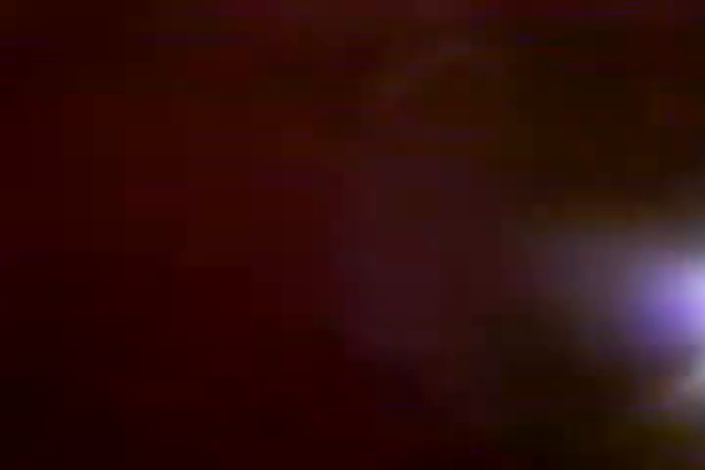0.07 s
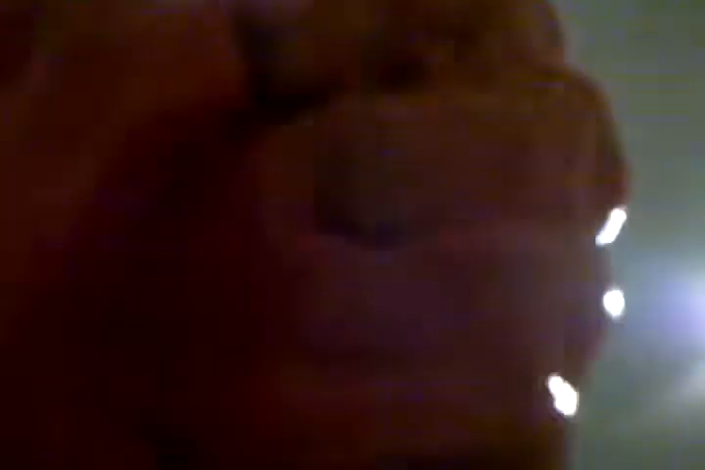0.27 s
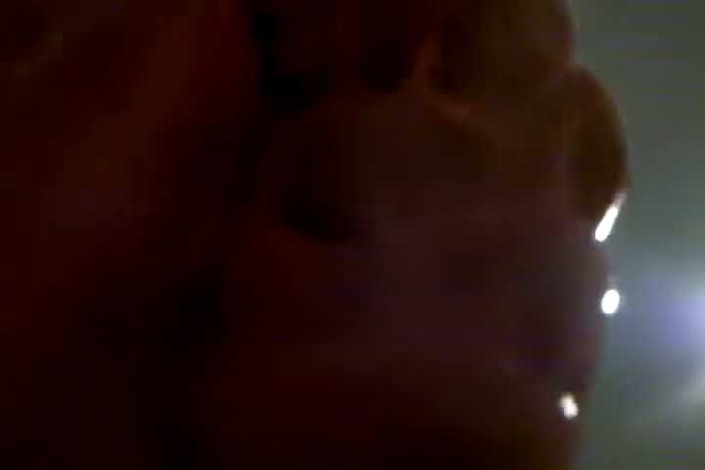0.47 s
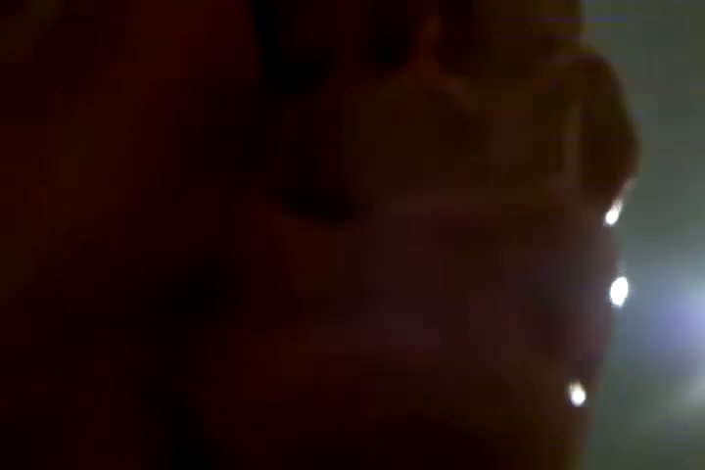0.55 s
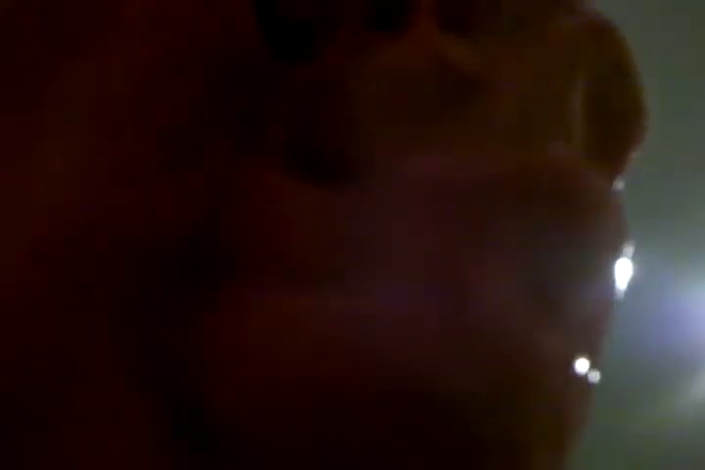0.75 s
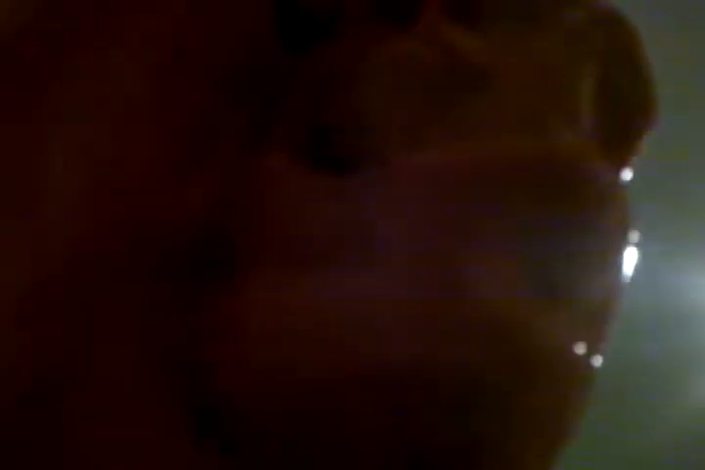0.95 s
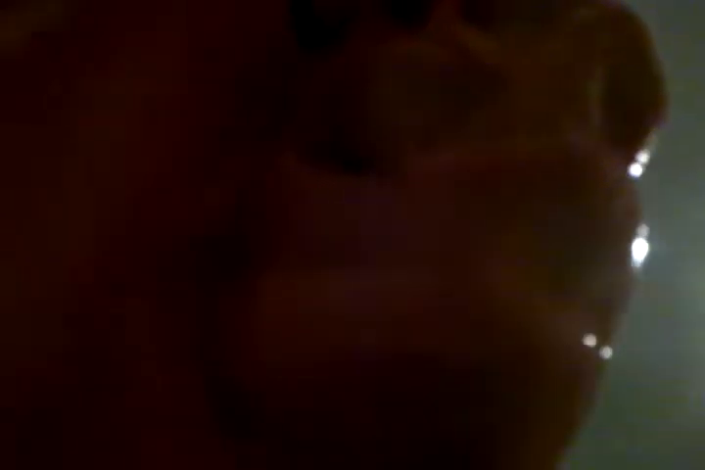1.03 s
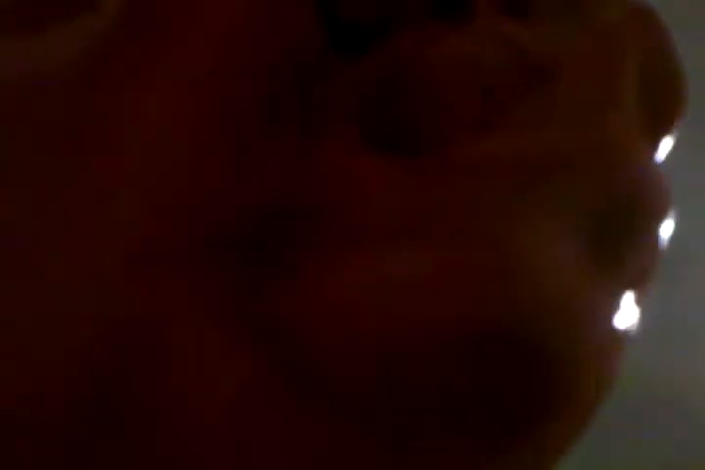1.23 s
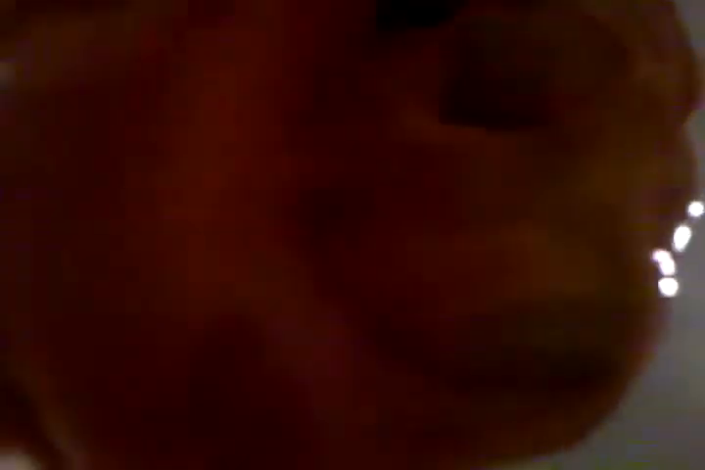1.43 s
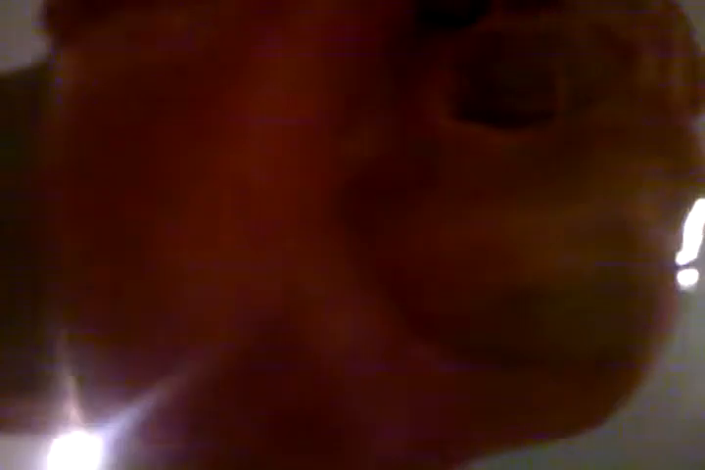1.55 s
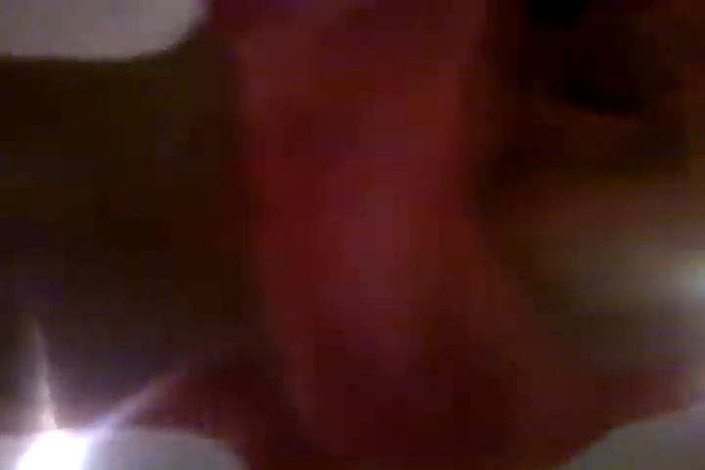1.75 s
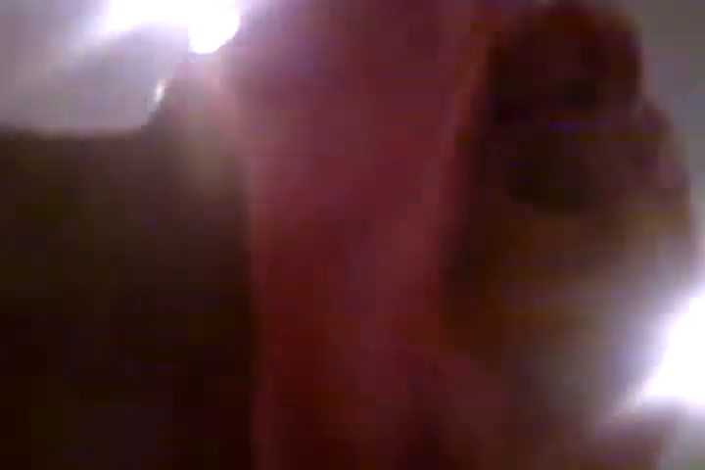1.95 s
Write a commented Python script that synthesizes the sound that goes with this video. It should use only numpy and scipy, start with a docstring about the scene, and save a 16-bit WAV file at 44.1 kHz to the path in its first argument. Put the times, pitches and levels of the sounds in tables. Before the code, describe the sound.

Putty squeezed right at the microphone lets out one short, loud, wet pop with a tiny squirt of air. Fingers then bump and rub it faintly, over steady hiss in a quiet room.

```python
"""A quiet room, putty squeezed at very close range. Trapped air pockets snap open, ringing
the thin skin; the last one squirts out in a falling, spitting whistle and a short wet gurgle.
Fingers bump and rub faintly afterwards, over steady hiss, a dull room hum and a thin whine."""
import sys
import numpy as np
from scipy import signal
from scipy.fft import rfft, irfft, next_fast_len
from scipy.io import wavfile
from scipy.ndimage import map_coordinates

SR = 44100
rng = np.random.default_rng(int(sys.argv[2]) if len(sys.argv) > 2 else 0)


def dump(signal):
    """Clip the signal to [-1, 1] and save it as 16-bit WAV at the path in sys.argv[1]."""
    limited = np.clip(np.atleast_2d(signal).T, -1, 1)
    pcm = np.round(limited * 32767).astype(np.int16)
    wavfile.write(sys.argv[1], SR, pcm)


N = 88200

# hiss spectrum (frequency [Hz], density [dB])
HISS_SPECTRUM = [(20, -56.5), (50, -49), (100, -13.5), (160, -18), (220, -2.5), (400, -2.5), (560, -4),
                 (800, -3), (1100, -5), (1700, -6.5), (2200, -7.5), (5300, -11), (6700, -16.5), (7400, -29),
                 (9000, -43)]
# room hums (centre [Hz], half-width [Hz], level [dB], drift [dB/s])
ROOM_HUMS = [(103, 7.6, -79.5, 5.5), (356, 10, -67, 0.5), (422.6, 19, -64, 4), (1665, 2, -64.5, -4)]
# hand rustle envelope (time [s], level [dB])
RUSTLE_ENVELOPE = [(0, -66.5), (1.3, -65), (1.38, -50), (1.52, -64), (1.65, -49.5), (1.71, -57.5),
                   (1.79, -48), (1.84, -58), (2, -65)]
# hand rustle spectrum (frequency [Hz], level [dB])
RUSTLE_SPECTRUM = [(40, -21.5), (100, -8), (250, 1.5), (420, 9.5), (700, -21.5), (1400, -16), (3000, -0.5),
                   (7000, -55)]
# finger drags (peak time [s], level [dB], centre [Hz], half-width [oct], rise [s], t60 [s])
FINGER_RUBS = [(0.267, -26.5, 6670, 0.11, 0.0041, 0.012), (0.412, -46, 5000, 0.24, 0.013, 0.028),
               (.635, -47.5, 1450, 0.73, 0.032, 0.044), (1.344, -36.5, 1230, 0.51, 0.0013, 0.013),
               (1.437, -48, 2460, 0.72, .001, 0.014), (1.614, -43, 1600, 0.62, 0.00074, 0.017),
               (1.769, -32.5, 1160, 0.35, 0.0059, 0.078), (1.793, -42, 3860, 0.72, 0.0089, 0.03),
               (1.803, -44, 1990, 0.13, 0.036, 0.025), (1.847, -50, 4930, .12, 0.0025, 0.026),
               (1.97, -49, 4500, 0.38, 0.01, 0.06)]
# soft finger contacts (time [s], level [dB], pitch [Hz], t60 [s])
FINGER_BUMPS = [(.411, -30.5, 488, 0.011), (.4232, -25, 687, 0.025), (.424, -39.5, 170, 0.028),
                (0.434, -40, 90, 0.064), (1.3446, -24.5, 385, 0.065), (1.3506, -16.5, 474, 0.016),
                (1.385, -32, 370, 0.024), (1.413, -35.5, 414, 0.034), (1.433, -34, 240, 0.03),
                (1.568, -35.5, 329, 0.029), (1.613, -27.5, 470, 0.015), (1.652, -30.5, 403, 0.02),
                (1.767, -23.5, 490, 0.013), (1.766, -37, 204, 0.066), (1.80, -35.5, 221, 0.08)]
# contact thud spectrum (frequency [Hz], level [dB])
THUD_SPECTRUM = [(30, -30.5), (110, 0), (400, 13.5), (800, 5.5), (1500, -25), (4000, -10), (7000, -35)]
# collapsing pocket envelope (time [s], level [dB])
GURGLE_ENVELOPE = [(.236, -67), (.245, -37), (.256, -44), (.27, -34), (.278, -57), (.296, -48.5),
                   (.304, -34.5), (.322, -42.5), (.345, -68)]
# collapsing pocket spectrum (frequency [Hz], level [dB])
GURGLE_SPECTRUM = [(60, -29), (200, -11), (500, -5.5), (790, 1), (1150, -7), (1700, -12), (5000, -18)]
# escaping air envelope (time [s], level [dB])
JET_ENVELOPE = [(.274, -39.5), (.2815, -31.5), (.285, -24), (.2862, -28), (.292, -22), (.2972, -29),
                (.301, -39), (.316, -36.5), (.33, -52), (.35, -75)]
# escaping air spectrum (frequency [Hz], level [dB])
JET_SPECTRUM = [(200, -18.5), (900, -11), (1800, -14.5), (3200, -2.5), (4200, -0.5), (5400, 2),
                (6700, -8.5), (7600, -10)]
# whistle of the widening hole (time [s], pitch [Hz], level [dB])
WHISTLE_GLIDE = [(.282, 6520, -60), (.2831, 6620, -5), (.2845, 6060, -63), (.2865, 5930, -26),
                 (.2898, 4960, -15.5), (.2915, 4340, -52), (.2937, 3830, -26.5), (.298, 3590, -24),
                 (.303, 3160, -55)]
# bursting pockets (peak time [s], skin swell [s], low skin mode [Hz], level [dB],
# high skin mode [Hz], level [dB], pocket mode [Hz], level [dB])
POCKET_POPS = [(0.2468, 0.0004, 3490, -14.5, 5400, -18, 514, -27.5),
               (.2673, 0.00049, 2700, -15, 5700, -15, 474, -26.5),
               (0.2679, .00032, 3400, -10.5, 6230, -11, 750, -14),
               (0.2818, 0.00042, 3170, -17.5, 6420, -28, 900, -32.5)]

HISS_DB, HISS_DRIFT_DB, RIPPLE_DB, RIPPLE_SPACING_HZ = -50, 1.24, 2.3, 26
WHINE_HZ, WHINE_WANDER_HZ, WHINE_DB, WHINE_FADE_DB_PER_S = 822, 6.4, -56, 4.5
GRAIN_RATE_HZ, RUB_GRAIN_DB = 891.7, 1.5
BUMP_ATTACK_S, THUD_DB, THUD_T60_S = 0.0012, -12.5, 0.039
POCKET_SWELL_CYCLES = 0.45
LOW_CUT_HZ, HIGH_CUT_HZ = 125, 7150
TIME_S = np.arange(N) / SR


def amp(db):
    return 10 ** (np.asarray(db) / 20)


def curves(rows):
    """Per-sample curve for each column after the time."""
    times_s, *columns = np.transpose(rows)
    return [np.interp(TIME_S, times_s, column) for column in columns]


def gated_gain(rows):
    """Gain from the last column [dB]; zero outside the table's span."""
    return amp(curves(rows)[-1]) * (TIME_S > rows[0][0]) * (TIME_S < rows[-1][0])


def wobble(rate_hz):
    """Smooth random curve, rate_hz knots a second."""
    return map_coordinates(rng.standard_normal(N // 8), [TIME_S * rate_hz], mode="wrap")


def filtered(x, response):
    """Zero-phase filter with gain response(hz)."""
    size = next_fast_len(N + 8192)
    hz = np.fft.rfftfreq(size, 1 / SR) + 1
    return irfft(rfft(x, size) * response(hz), size)[:N]


def colour(spectrum):
    """Response through (frequency [Hz], level [dB]) points."""
    points_hz, db = np.transpose(spectrum)
    return lambda hz: amp(np.interp(np.log(hz), np.log(points_hz), db))


def noise(response, grain_db=0):
    """Unit-rms coloured noise; grain_db clumps it into sticky grains."""
    white = rng.standard_normal(N)
    x = filtered(white * amp(grain_db * wobble(GRAIN_RATE_HZ)), response)
    return x / np.sqrt(np.mean(x ** 2) + 1e-20)


def decay(start_s, attack_s, t60_s):
    """Quick rise, exponential fall."""
    t = np.maximum(TIME_S - start_s, 0)
    return (1 - np.exp(-t / attack_s)) * np.exp(-np.log(1000) * t / t60_s)


def damped_mode(peak_s, hz, swell_s):
    """Note that swells until peak_s and dies within a few cycles."""
    t = np.maximum(TIME_S - peak_s + swell_s, 0)
    return np.sin(2 * np.pi * hz * t) * (t / swell_s * np.exp(1 - t / swell_s)) ** 2


def hiss():
    """Steady hiss with a finely rippled spectrum and slight level drift."""
    knots = rng.standard_normal(SR // 2)
    ripple = lambda hz: amp(RIPPLE_DB * map_coordinates(knots, [hz / RIPPLE_SPACING_HZ]))
    gain = amp(HISS_DB + HISS_DRIFT_DB * wobble(9.03))
    return gain * noise(lambda hz: colour(HISS_SPECTRUM)(hz) * ripple(hz))


def room_hum():
    """Narrow noise bands, each slowly rising or fading."""
    out = np.zeros(N)
    for centre_hz, half_width_hz, db, drift_db_per_s in ROOM_HUMS:
        band = noise(lambda hz: 1 / (1 + ((hz - centre_hz) / half_width_hz) ** 2))
        out += amp(db + drift_db_per_s * TIME_S) * band
    return out


def whine(waver_db=3.3):
    """Faint wandering tone that fades into the hiss."""
    hz = WHINE_HZ + WHINE_WANDER_HZ * wobble(9.6)
    db = WHINE_DB - WHINE_FADE_DB_PER_S * TIME_S + waver_db * wobble(6.2)
    return amp(db) * np.sin(2 * np.pi * np.cumsum(hz) / SR)


def hand_rustle(waver_db=2.5):
    """Dull, grainy rustle of the hand."""
    db = curves(RUSTLE_ENVELOPE)[0] + waver_db * wobble(35.07)
    return amp(db) * noise(colour(RUSTLE_SPECTRUM), RUB_GRAIN_DB)


def rubs():
    """Skin clings and peels: a grainy band swells and dies away."""
    out = np.zeros(N)
    for peak_s, db, centre_hz, half_width_oct, rise_s, t60_s in FINGER_RUBS:
        t = TIME_S - peak_s
        envelope = np.exp(np.minimum(t / rise_s, -np.log(1000) * t / t60_s))
        band = noise(lambda hz: 1 / (1 + (np.log2(hz / centre_hz) / half_width_oct) ** 2), RUB_GRAIN_DB)
        out += amp(db) * envelope * band
    return out


def bumps():
    """Each soft contact gives a damped low note and a dull thud."""
    thud_noise = noise(colour(THUD_SPECTRUM))
    out = np.zeros(N)
    for start_s, db, hz, t60_s in FINGER_BUMPS:
        note = np.sin(2 * np.pi * hz * (TIME_S - start_s)) * decay(start_s, BUMP_ATTACK_S, t60_s)
        thud = amp(THUD_DB) * thud_noise * decay(start_s, BUMP_ATTACK_S, THUD_T60_S)
        out += amp(db) * (note + thud)
    return out


def gurgle():
    """The wet pocket collapses in a burst of grainy noise."""
    return gated_gain(GURGLE_ENVELOPE) * noise(colour(GURGLE_SPECTRUM), grain_db=2.5)


def squirt(pitch_waver=0.035):
    """Air spits through a hole; its whistle falls as the hole widens."""
    jet = gated_gain(JET_ENVELOPE) * noise(colour(JET_SPECTRUM), grain_db=2)
    hz = curves(WHISTLE_GLIDE)[0] * (1 + pitch_waver * wobble(1200))
    whistle = gated_gain(WHISTLE_GLIDE) * np.sin(2 * np.pi * np.cumsum(hz) / SR)
    return jet + whistle


def pops():
    """Each burst rings the putty's thin skin at two pitches and thumps the air pocket behind it."""
    out = np.zeros(N)
    for peak_s, swell_s, low_hz, low_db, high_hz, high_db, pocket_hz, pocket_db in POCKET_POPS:
        out += amp(low_db) * damped_mode(peak_s, low_hz, swell_s)
        out += amp(high_db) * damped_mode(peak_s, high_hz, swell_s)
        out += amp(pocket_db) * damped_mode(peak_s, pocket_hz, POCKET_SWELL_CYCLES / pocket_hz)
    return out


def scene():
    """Close, dry, mono; the putty and hand sounds fall away below about 125 Hz."""
    putty = pops() + squirt() + gurgle() + bumps() + rubs() + hand_rustle()
    low_cut = signal.butter(2, LOW_CUT_HZ, "high", fs=SR, output="sos")
    return (signal.sosfilt(low_cut, putty) + room_hum() + hiss() + whine())[None]


def record(dry):
    """Steep low-pass; drops the top treble."""
    return filtered(dry[0], lambda hz: 1 / np.sqrt(1 + (hz / HIGH_CUT_HZ) ** 70))[None]


dry = scene()
out = record(dry)
dump(out)
```